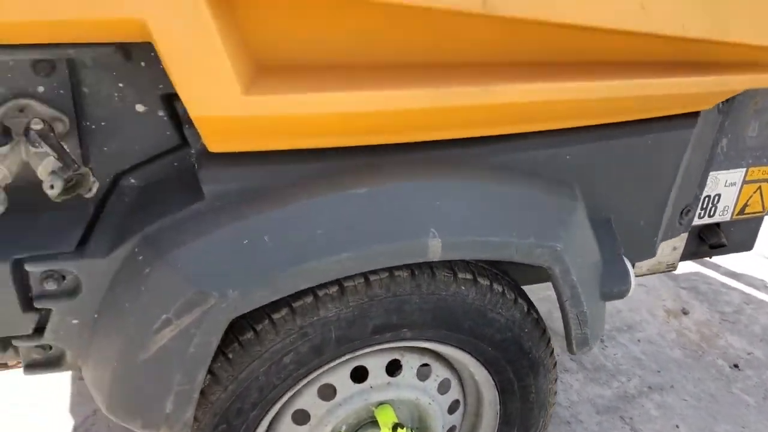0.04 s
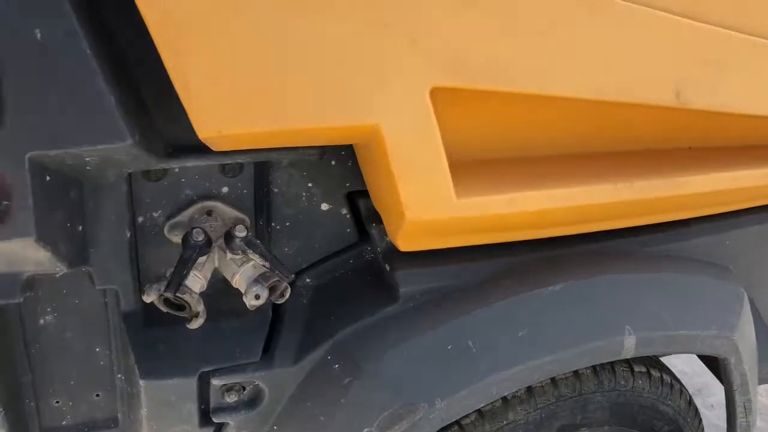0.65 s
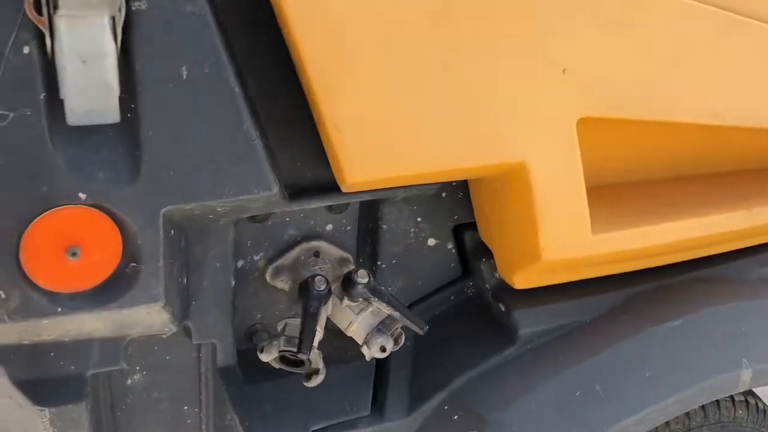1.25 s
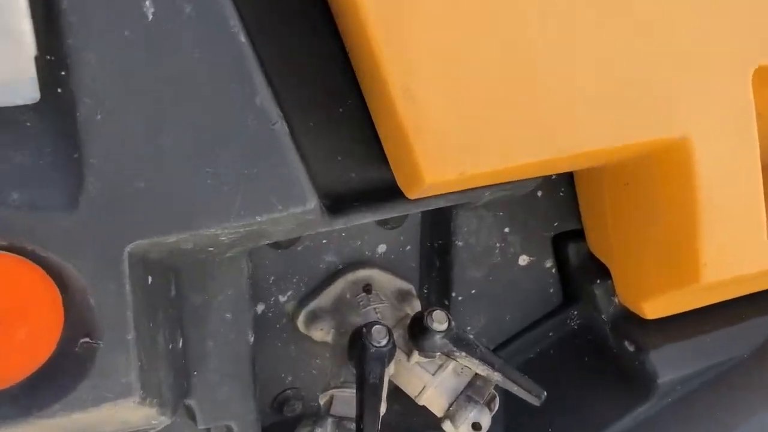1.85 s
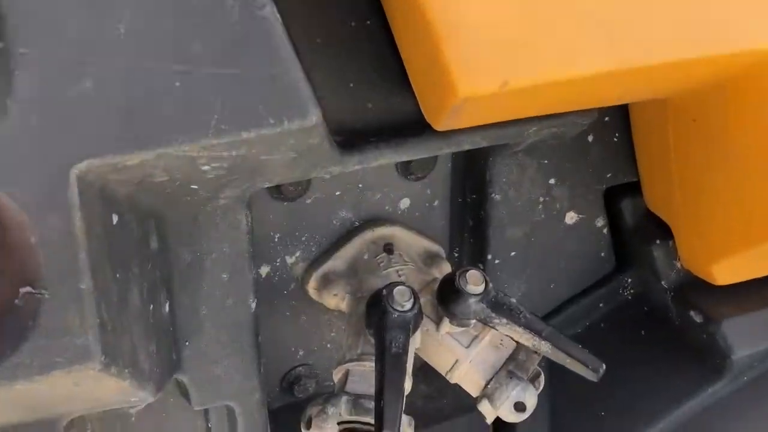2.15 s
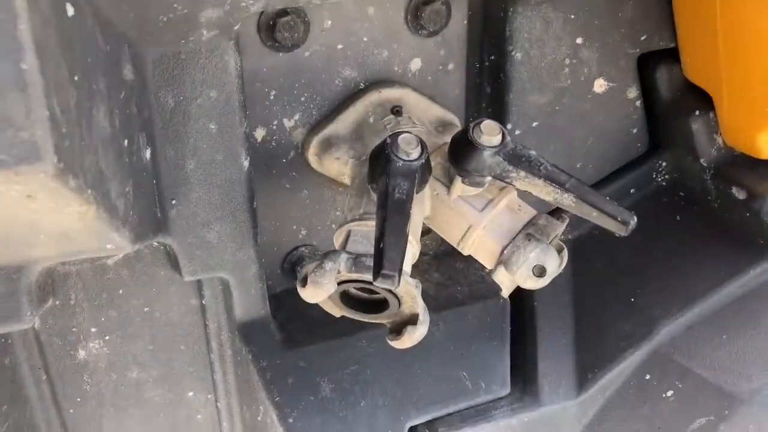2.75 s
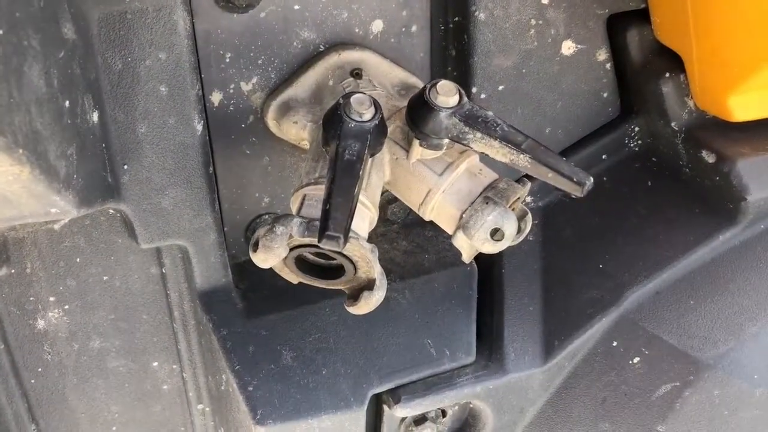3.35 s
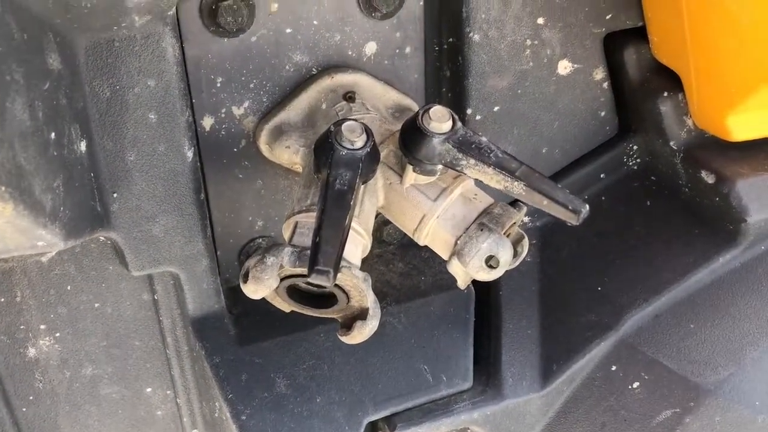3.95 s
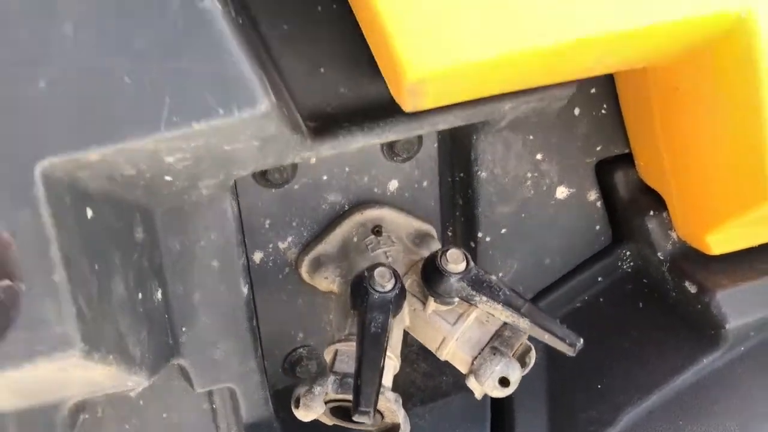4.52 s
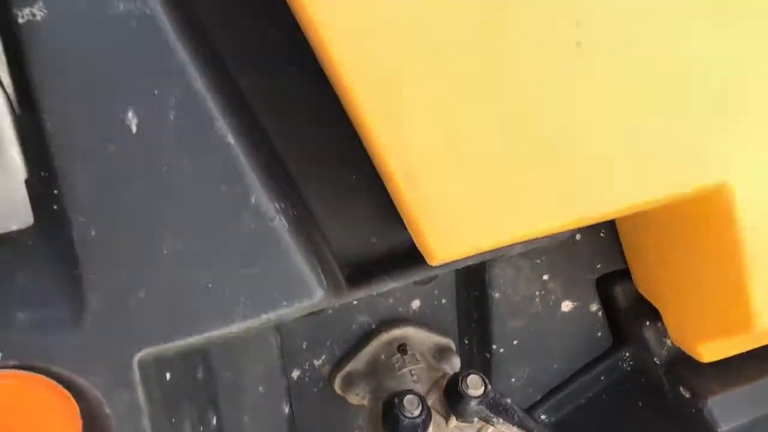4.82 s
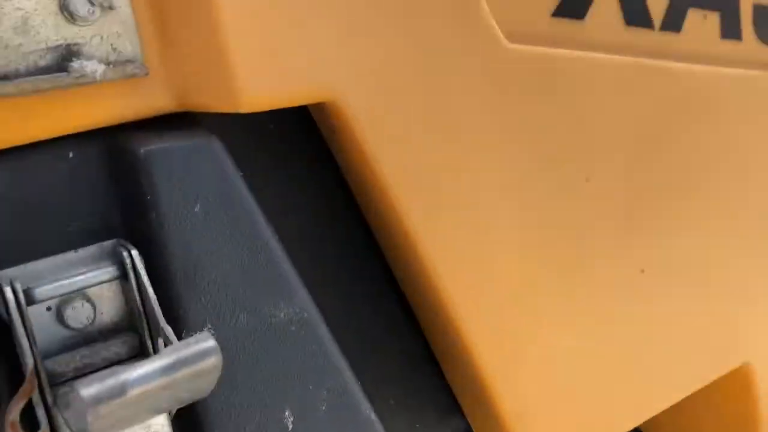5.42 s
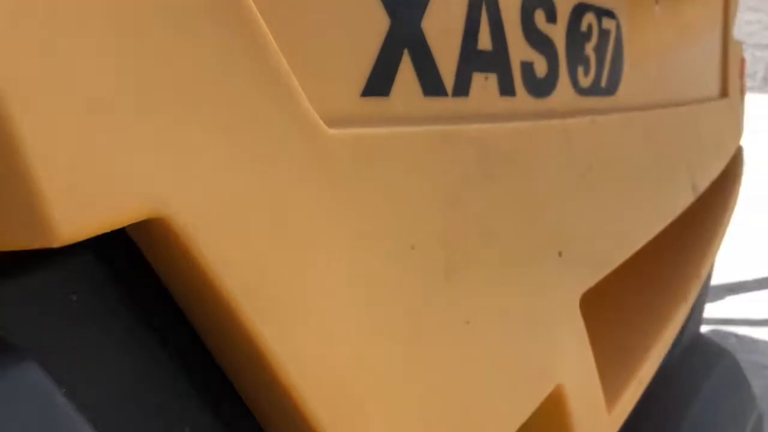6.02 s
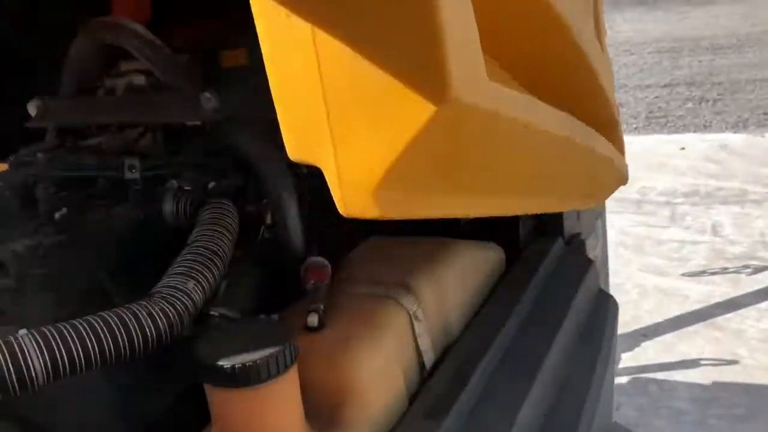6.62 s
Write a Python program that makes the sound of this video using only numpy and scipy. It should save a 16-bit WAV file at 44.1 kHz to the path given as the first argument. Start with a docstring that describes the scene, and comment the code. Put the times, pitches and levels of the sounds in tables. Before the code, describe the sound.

A portable diesel compressor runs outdoors with air hissing continuously from its outlet. At first a low engine drone is heard beneath the hiss. As the microphone comes close to the valve, the air grows louder, with a gusty low rush and a few tiny breaks. The microphone then moves up to the engine cover, where the hiss softens slightly and the engine's hum and clatter come forward.

```python
"""Air hissing from a diesel compressor

A portable compressor runs steadily outdoors while air rushes out of its open valve. The churning jet
makes the valve and the recess around it ring, and the recess beams its tones in different directions.
The microphone moves from the wheel past the valve and up to the canopy (the engine's cover),
where the engine's drone comes through."""
import sys
import numpy as np
from scipy import signal
from scipy.fft import rfft, irfft, next_fast_len
from scipy.io import wavfile

SR = 44100
rng = np.random.default_rng(int(sys.argv[2]) if len(sys.argv) > 2 else 0)


def generate_wav(signal):
    """Clip the signal to [-1, 1] and save it as 16-bit WAV at the path in sys.argv[1]."""
    frames = np.transpose(np.atleast_2d(signal))
    scaled = np.clip(frames, -1, 1) * 32767
    pcm = np.round(scaled).astype(np.int16)
    wavfile.write(sys.argv[1], SR, pcm)


N = 294147
TIME = np.arange(N) / SR

# The microphone's walk. Each row: time in seconds, angle in degrees (0 faces the outlet).
MIC_ANGLES = [(0, -80), (1, -46), (2.8, -6), (4.2, 6), (4.7, 24), (6.2, 66), (6.67, 90)]
# The tone colour of the bare jet. Each row: frequency in Hz, relative level in dB.
JET_COLOUR = [(110, -4), (200, -2.5), (300, -5), (420, -1.0), (750, -0.6), (1300, -3), (2600, -4),
              (5000, 0.3), (7500, -7.5), (10000, -0.5), (13000, -3), (15500, 2)]
# The ringing of valve and pipe, heard from all sides. Each row: pitch in Hz, width in Hz, boost in dB.
VALVE_RINGS = [(515, 127, 8), (985, 110, 4.5), (1913, 410, 10), (3226, 930, 6), (4234, 290, 6.5),
               (5985, 780, 11.5), (6710, 546, 8.5), (7960, 210, 3.5), (9100, 37, 4.5), (9420, 1140, 4.5),
               (11620, 480, 5), (13960, 760, 6.1), (14740, 1040, 0.5)]
# The rings (+) and shadows (-) of the recess, each aimed one way. Each row: pitch in Hz, width in Hz,
# boost in dB where it aims, aim in degrees, spread in degrees.
RECESS_BEAMS = [(847, 90, 5, 75, 41), (1060, 54, 8.5, -58, 23), (2063, 80, 10, -30, 22),
                (2055, 176, 7, 32, 15), (2300, 360, 5.5, 80, 34), (3280, 470, 7.5, -63.5, 15),
                (4194, 510, -13.5, 90, 24), (5440, 3600, -4, -1, 11), (5900, 970, -8, 79, 12),
                (5810, 210, 5.5, 58, 5.6), (6830, 660, -11.5, 62, 26), (7600, 370, 5, 84, 44),
                (7860, 400, -7, -24, 9), (8400, 570, 7.5, -4, 45)]
# The recess walls that mirror the jet. Each row: extra path in metres, its change in metres per degree,
# share reflected (minus flips the wave), aim in degrees, spread in degrees.
RECESS_WALLS = [(0.1385, .0014, 0.14, -45, 21), (0.2052, 0, 0.24, 9.5, 13.5),
                (0.282, .00065, -0.088, -16, 27), (0.208, -.0002, -0.14, 29, 44)]
# Brief breaks in the hiss. Each row: middle in seconds, share lost from 0 to 1, half length in seconds.
HISS_DIPS = [(1.302, .85, .0075), (2.985, .9, .0075), (3.069, .92, .0075), (3.305, .92, .008),
             (3.667, .94, .009), (6.484, .88, .0075)]
# How loud the engine is along the walk. Each row: time in seconds, gain in dB.
ENGINE_LEVELS = [(0.1, -33.5), (0.85, -41), (1.25, -34), (1.55, -41), (2.4, -48), (4.55, -46.5),
                 (5.65, -36.5), (6.55, -31)]
# The tones of the exhaust drone. Each row: multiple of the crankshaft's speed, relative level in dB.
EXHAUST_TONES = [(2, -17), (3, -1), (5, -23), (6, -18), (9, -31)]
# Tones from the engine bay, under the lifted canopy. Each row: multiple of the crankshaft's speed,
# relative level in dB.
BAY_TONES = [(4, -32), (6, -9), (8, -21), (9, -14), (10, -12), (12, -10.5), (16, -12), (18, -10)]
# How much of the bay is heard. Each row: time in seconds, gain in dB on top of ENGINE_LEVELS.
BAY_LEVELS = [(0, -34), (5, -14), (5.8, -6), (6.3, -2.5), (6.67, -1.5)]
# The tone colour of the clatter as the fuel fires. Each row: frequency in Hz, relative level in dB.
CLATTER_COLOUR = [(100, -32), (250, -2), (500, -4), (1200, -1), (2400, -7), (5000, -10), (12000, -26)]
# The tone colour of the rumbling housing. Each row: frequency in Hz, relative level in dB.
RUMBLE_COLOUR = [(10, -20), (28, -19), (42, -10), (55, 1), (80, 0), (110, -4), (170, -18), (400, -50)]


def air_jet(angle, flutter_db, flutter_hz):
    """Churning air hisses at the outlet, coloured by the valve and by the side it is heard from."""
    air = high_pass(noise(JET_COLOUR), hz=77.5, order=3)
    air = air * from_db(flutter_db * drift(flutter_hz))   # the flow is slightly unsteady
    for hz, width, db in VALVE_RINGS:
        air = resonate(air, hz, width, db)
    for hz, width, db, aim, spread in RECESS_BEAMS:
        air = resonate(air, hz, width, db * beam(angle, aim, spread))
    # Big swirls of air add a low rush that comes in gusts and carries only a short way.
    in_front = np.exp(-(angle / 35) ** 4)
    rush_db = -3 + 7.5 * in_front + 0.002 * angle
    air = resonate(air, hz=210, width=240, db=rush_db + 1.8 * drift(6.1))
    treble_db = -0.63 - 0.0266 * angle   # the body's edges shade the treble towards the canopy
    air = resonate(air, hz=11200, width=10600, db=treble_db)
    level_db = -18 + 3 * beam(angle, aim=0, spread=19.8) - 0.0016 * angle
    return air * from_db(level_db)


def recess_walls(air, angle):
    """Close echoes boost some pitches and cancel others; the pattern slides as the microphone passes."""
    return air + sum(share * beam(angle, aim, spread) * delay(air, metres + slope * (angle - aim))
                     for metres, slope, share, aim, spread in RECESS_WALLS)


def echoes(air, angle):
    """Echoes off the concrete and the panels shift as the microphone moves, faintly sweeping the hiss."""
    short_waves = high_pass(air, hz=760, order=1)   # long waves bend around edges instead of bouncing
    ground_metres = 1.25 - 0.25 * np.exp(-TIME / 1.15)   # the extra path grows as the microphone rises
    offsets = np.linspace(-.12, .12, 7) + rng.normal(0, .01, 7)
    mirrored = delay(short_waves, ground_metres)
    scattered = scatter(short_waves, ground_metres + offsets[:, None])
    ground = .55 * mirrored + .75 * scattered
    ground_db = -11 - 4 * beam(angle, aim=0, spread=19.8)
    # Each panel and edge lies at its own distance, which changes with the angle.
    panel_metres = [metres + rng.normal(0, .0015) * angle for metres in np.geomspace(.28, 2.6, 14)]
    return from_db(ground_db) * ground + from_db(-11.5) * scatter(short_waves, panel_metres)


def brief_dips(air, whistle_db, whistle_width_hz):
    """For a few hundredths of a second the hiss sinks and thins to a few whistles."""
    lost = sum(share * np.exp(-.5 * ((TIME - middle) / half) ** 2) for middle, share, half in HISS_DIPS)
    pitches = np.linspace(1800, 12500, 14) * rng.uniform(.95, 1.05, 14)
    whistles = sum(band(air, hz, whistle_width_hz) for hz in pitches)
    return (1 - lost) * air + lost * from_db(whistle_db) * whistles


def diesel_engine(crank_hz, speed_wander, clatter_db, rumble_db):
    """An engine held near one speed: the exhaust drones, the bay hums and clatters, the housing rumbles."""
    turns = np.cumsum(crank_hz * (1 + speed_wander * drift(1.5))) / SR
    since_firing = (3 * turns) % 1   # three firings to each turn of the crankshaft
    clatter = rms_one(noise(CLATTER_COLOUR) * np.exp(-since_firing / .3))   # each knocks and dies away
    bay = hum(BAY_TONES, turns, waver_db=3.0) + from_db(clatter_db) * clatter
    exhaust = hum(EXHAUST_TONES, turns, waver_db=.5)
    engine = exhaust + from_db(over_time(BAY_LEVELS)) * bay
    rumble = rms_one(noise(RUMBLE_COLOUR))
    return from_db(over_time(ENGINE_LEVELS)) * engine + from_db(rumble_db) * rumble


def hum(tones, turns, waver_db):
    """Tones that keep step with the crankshaft, each wavering a little in loudness."""
    return np.sqrt(2) * sum(from_db(db + waver_db * drift(7)) * np.sin(2 * np.pi * multiple * turns)
                            for multiple, db in tones)


def beam(angle, aim, spread):
    """The share of a beam heard at this angle: 1 where it aims, fading to both sides."""
    return np.exp(-.5 * ((angle - aim) / spread) ** 2)


def scatter(air, paths):
    """Equal echoes over extra paths in metres, randomly flipped; together about as strong as the sound."""
    return sum(rng.choice([-1, 1]) * delay(air, metres) for metres in paths) / np.sqrt(len(paths))


def delay(x, metres):
    """The same sound arriving later, after an extra path at 343 metres a second."""
    return np.interp(TIME - metres / 343, TIME, x)


def band(x, hz, width):
    """Keep the pitches around hz; the width is in Hz too."""
    return signal.lfilter(*signal.iirpeak(hz, hz / width, fs=SR), x)


def resonate(x, hz, width, db):
    """Turn one band up or down; db may change over time."""
    return x + (from_db(db) - 1) * band(x, hz, width)


def high_pass(x, hz, order):
    """Fade out what lies below hz."""
    return signal.sosfilt(signal.butter(order, hz, "high", fs=SR, output="sos"), x)


def noise(colour):
    """Even noise shaped by a tone colour table."""
    size = next_fast_len(N)
    hz, db = np.transpose(colour)
    bins = np.maximum(np.fft.rfftfreq(size, 1 / SR), 1)
    gains = from_db(np.interp(np.log(bins), np.log(hz), db))
    return irfft(rfft(rng.standard_normal(size)) * gains, size)[:N]


def drift(hz):
    """A smooth random wobble of about size 1, mostly slower than hz."""
    memory = np.exp(-2 * np.pi * hz * 40 / SR)
    steps = rng.standard_normal(N // 40 + 2002)   # one for every 40 samples, plus a run-up
    slow = signal.lfilter([1], [1, -2 * memory, memory * memory], steps)[2000:]
    return np.interp(np.arange(N) / 40, np.arange(len(slow)), rms_one(slow))


def over_time(rows):
    """Join rows of time and value with straight lines."""
    return np.interp(TIME, *np.transpose(rows))


def from_db(db):
    """Turn decibels into a number to multiply by."""
    return 10 ** (db / 20)


def rms_one(x):
    """Scale a signal to an average strength (rms) of 1."""
    return x / np.sqrt(np.mean(x ** 2))


def scene():
    """The hiss and the engine, the same in both channels."""
    angle = over_time(MIC_ANGLES)
    air = air_jet(angle, flutter_db=1.01, flutter_hz=102)
    air = recess_walls(air, angle)
    air = from_db(-0.34) * (air + echoes(air, angle))
    air = brief_dips(air, whistle_db=14, whistle_width_hz=12)
    sound = air + diesel_engine(crank_hz=26.78, speed_wander=0.0022, clatter_db=-4, rumble_db=-48.0)
    return np.array([sound, sound])


def record(dry):
    """Round off the highest peaks and cut the treble steeply above 15800 Hz."""
    rounded = dry / (1 + (dry / .82) ** 8) ** (1 / 8)
    return signal.sosfilt(signal.ellip(12, .1, 90, 15800, fs=SR, output="sos"), rounded)


dry = scene()
out = record(dry)
generate_wav(out)
```